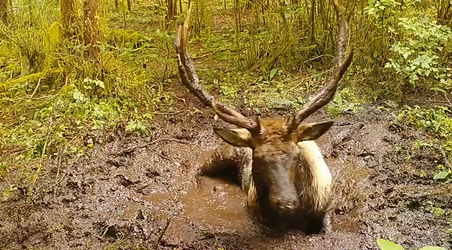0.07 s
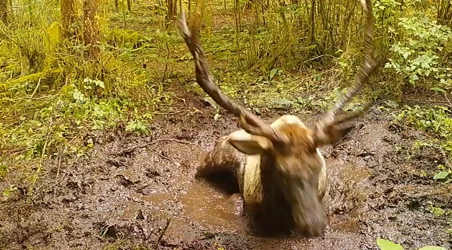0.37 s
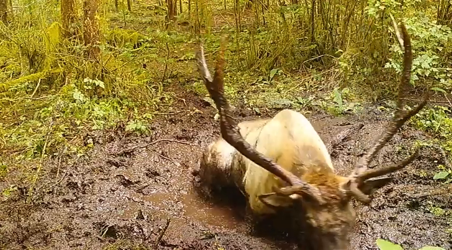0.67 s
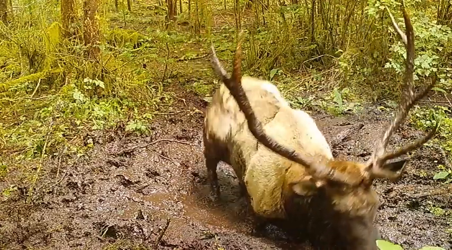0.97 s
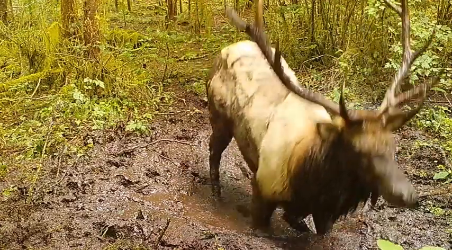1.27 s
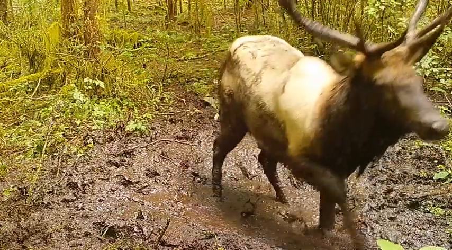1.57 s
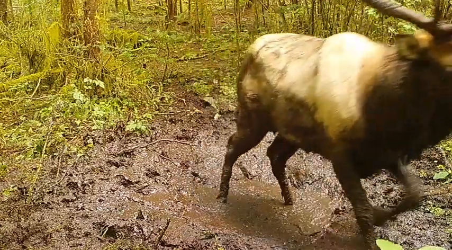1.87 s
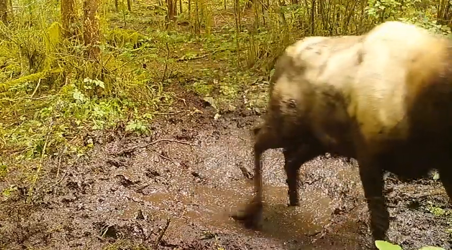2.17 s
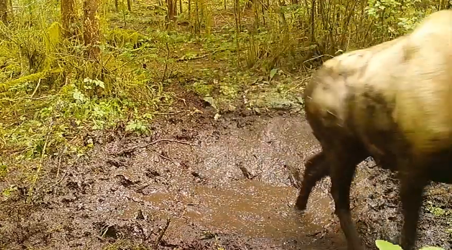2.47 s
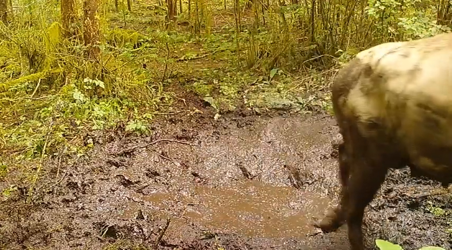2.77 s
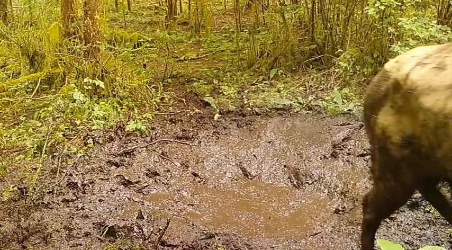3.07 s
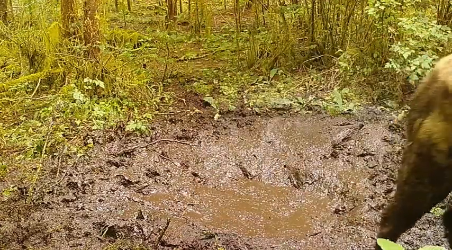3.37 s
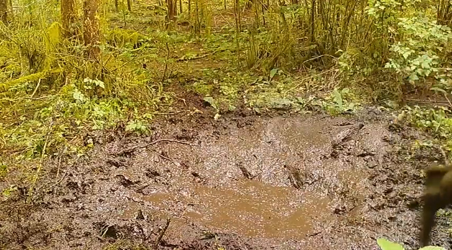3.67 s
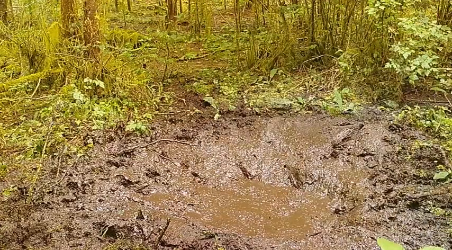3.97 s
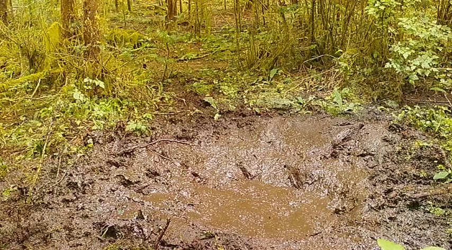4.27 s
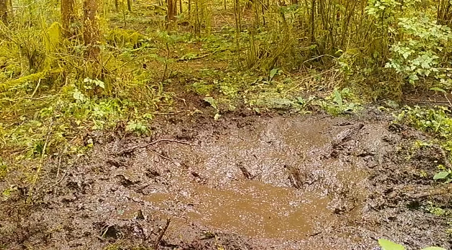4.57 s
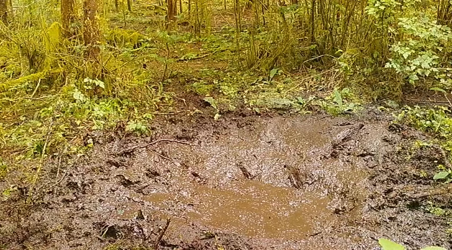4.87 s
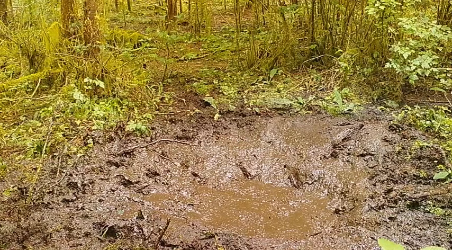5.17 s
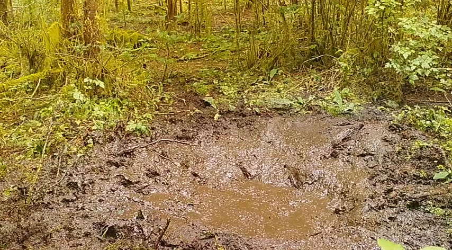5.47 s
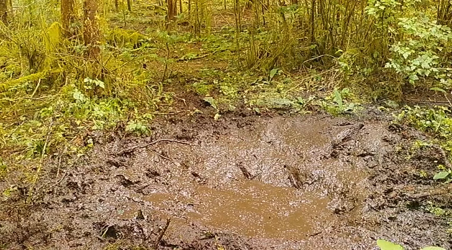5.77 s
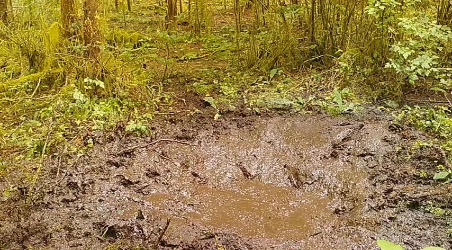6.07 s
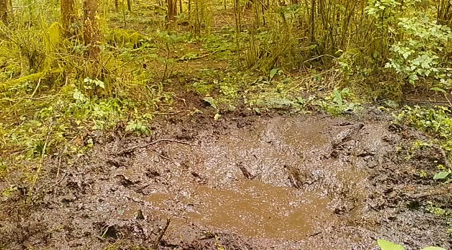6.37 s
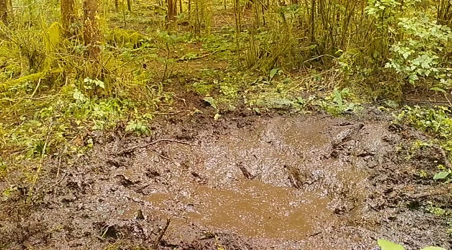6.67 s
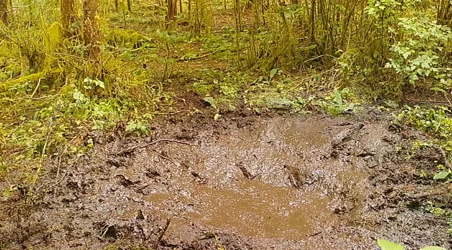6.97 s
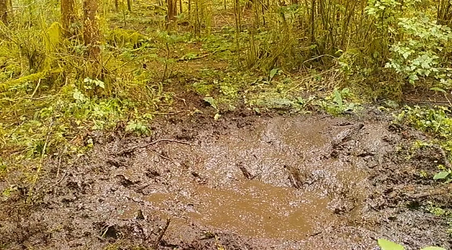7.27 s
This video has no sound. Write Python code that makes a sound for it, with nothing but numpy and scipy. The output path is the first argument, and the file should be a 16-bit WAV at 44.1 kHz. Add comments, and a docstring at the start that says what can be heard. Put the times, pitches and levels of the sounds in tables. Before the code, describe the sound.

An elk's hooves squelch, suck and crackle through wet mud, with snapping twigs and popping bubbles over a faint forest hiss.

```python
"""Elk leaving a forest wallow

One microphone near a muddy wallow, in the faint hiss of a still forest. An elk heaves itself out and
walks off through the undergrowth. Its hooves squeeze and suck at the mud, air pockets gulp, bubbles
and twigs snap, and wet mud and leaves crackle between the steps. The bushes dull it as it goes."""
import sys
import numpy as np
from scipy import signal
from scipy.io import wavfile
from scipy.ndimage import uniform_filter1d

SR = 44100
rng = np.random.default_rng(int(sys.argv[2]) if len(sys.argv) > 2 else 0)


def generate_wav(signal):
    """Clip the signal to [-1, 1] and save it as 16-bit WAV at the path in sys.argv[1]."""
    frames = np.transpose(np.atleast_2d(signal))
    scaled = np.clip(frames, -1, 1) * 32767
    pcm = np.round(scaled).astype(np.int16)
    wavfile.write(sys.argv[1], SR, pcm)


N = 327222

# Levels are relative within each table; "body" is the low band re the bright one.
# spectra of the still forest, the leaf litter and the wet mud: f/Hz, level/dB
AIR_SPECTRUM = [(15, -60), (25, -15), (349, -13.5), (1080, -12), (1340, -9), (1750, -13), (2560, -12.5),
                (3700, -9), (5000, -5.5), (6210, -7.5), (7500, -15.5), (15500, -14)]
LITTER_SPECTRUM = [(150, -63), (250, -33.5), (466, -18), (573, -16.5), (692, -15), (809, -18.5),
                   (1100, -14.5), (1430, -11.5), (2060, -12), (2620, -7.5), (3110, -9.5), (5040, -3.5),
                   (7250, -17.5), (13700, -27.5), (15500, -21.5)]
MUD_SPECTRUM = [(71, -100), (120, -55), (250, -16), (346, -19), (415, -22), (563, -13), (690, -17.5),
                (780, -19), (1100, -22.5), (1910, -6), (3730, 2), (4860, 8), (5380, 7), (5840, 2.5),
                (15500, -24.5)]
# echo off the trunks: f/Hz, level/dB, t60/s
TRUNK_ECHO = [(200, 5, 0.1), (1200, 9, 0.13), (3220, -1.5, 0.27), (5060, 1, 0.22), (7500, -0.5, 0.35),
              (14100, 4.5, 0.25)]
# restless mud and leaves between the steps: t/s, level/dB
STIRRING = [(0, -68), (.43, -73), (.65, -68), (.87, -76), (1.28, -75), (1.55, -58), (1.95, -57),
            (2.1, -54.5), (2.38, -60), (2.47, -58), (2.85, -72), (3.15, -64), (3.58, -68), (4.0, -57),
            (4.35, -67.5), (4.7, -59), (5.05, -75.5), (5.3, -69.5), (5.5, -55.5), (5.95, -60), (6.22, -68),
            (6.6, -63.5), (6.9, -62.5), (7.15, -74.5), (7.42, -61.5)]
# the elk shifts its weight: crest t/s, level/dB, fall/s, body/dB
WEIGHT_SHIFTS = [(0.067, -58.5, 0.019, -1.5), (.765, -65, 0.18, -1), (0.939, -62, 0.034, 1),
                 (1.07, -60, 0.074, -20), (1.58, -49, 0.13, -4.5), (1.72, -54, 0.11, -35),
                 (2.212, -47.5, 0.046, -7.5), (2.574, -41.5, 0.04, -13.5), (2.64, -49.5, 0.1, -8),
                 (3.04, -52.5, 0.081, -17), (3.395, -46, 0.1, -10), (3.792, -53, 0.14, -17),
                 (4.185, -49, 0.079, -13.5), (4.57, -61, 0.046, -9), (4.792, -49.5, 0.017, -13),
                 (4.89, -50.5, 0.064, -26), (4.938, -43.5, 0.024, -16), (5.17, -60, 0.19, -16),
                 (5.64, -55.5, 0.062, -10), (5.83, -59.5, 0.1, -6.5), (6.039, -55.5, 0.12, -16.5),
                 (6.274, -52.5, 0.017, -23), (6.562, -57, 0.064, -3.5), (6.758, -52.5, 0.014, -6.5)]
# dull pushes on the soft ground: t/s, level/dB, f/Hz
GROUND_THUDS = [(1.391, -67.5, 161), (1.455, -66, 135), (1.747, -72, 160), (2.88, -56.5, 100),
                (3.421, -72, 115), (3.918, -78, 130), (7.316, -63.5, 96)]
# water forced through a narrow gap: crest t/s, level/dB, f/Hz, length/s
WATER_SQUEAKS = [(0.077, -59, 5600, 0.02), (0.327, -59.5, 5550, 0.0082), (0.736, -56, 4500, 0.009),
                 (1.072, -58, 4530, 0.013), (3.12, -48.5, 5240, 0.0073), (4.446, -55, 4870, 0.018),
                 (4.537, -46.5, 5300, 0.0091), (4.56, -49.5, 4720, 0.032), (4.631, -51.5, 4950, 0.023),
                 (5.119, -44.5, 5200, 0.011), (6.05, -54, 5230, 0.0086), (6.565, -56, 5200, 0.032)]
# runs of bubbles: t/s, level/dB, f/Hz, length/s
BUBBLE_RUNS = [(0.05, -61, 1150, 0.031), (0.905, -60.5, 1910, 0.051), (1.367, -66, 490, 0.024),
               (1.406, -55.5, 1290, 0.0093), (1.468, -56.5, 720, 0.011), (2.688, -50.5, 1400, 0.0098),
               (4.846, -62.5, 885, 0.011), (4.91, -58.5, 1200, 0.026), (5.233, -65.5, 845, 0.0072),
               (5.451, -66, 884, 0.0076), (5.687, -57.5, 1104, 0.022), (6.44, -63, 750, .012),
               (6.466, -63, 785, .025)]
# small bubbles popping: t/s, level/dB, f/Hz
BUBBLE_POPS = [(.067, -41.5, 1460), (0.201, -45.5, 1830), (.222, -44, 6860), (0.276, -50, 2280),
               (0.813, -40, 1290), (1.037, -45.5, 1910), (1.059, -51, 1670), (1.218, -45, 2670),
               (1.422, -46, 2320), (1.606, -22, 6960), (1.658, -28.5, 2360), (1.667, -33, 8400),
               (1.673, -29.5, 7500), (1.717, -31, 5300), (1.83, -33, 4300), (2.025, -44, 2520),
               (2.403, -45, 2400), (2.574, -41, 1400), (2.58, -22, 3000), (2.593, -26, 4830),
               (2.627, -41.5, 1530), (2.915, -49, 1300), (2.92, -34.5, 2600), (2.925, -37.5, 1880),
               (3.47, -38, 2690), (3.62, -38.5, 2430), (3.795, -42, 1850), (3.939, -33.5, 2730),
               (4.551, -33.5, 4770), (4.68, -40.5, 2560), (5.076, -35.5, 2170), (5.077, -27.5, 3600)]
# hoof-sized hollows gulping: t/s, level/dB, f/Hz, glide/(octaves per s), t60/s, side modes/dB
HOOF_HOLLOWS = [(1.519, -43, 475, -10.5, 0.057, -18), (1.55, -57.5, 330, 22, 0.09, 1),
                (1.804, -52, 542, 21, 0.073, -21), (2.579, -49.5, 340, 41, 0.028, -12),
                (2.8757, -31.5, 554, -10, 0.059, -2.5), (2.881, -43, 203, -5, 0.038, -30),
                (2.905, -47, 481, -3.5, 0.049, -20), (3.306, -48, 385, -6.5, 0.055, 8.5),
                (3.337, -52.5, 475, -20, 0.068, -14), (3.386, -46.5, 385, 12, 0.017, -3),
                (3.416, -34.5, 523, 4, 0.031, 3.5), (3.417, -39, 820, -13, 0.033, -8),
                (3.423, -39, 345, 11, 0.035, 1.5), (3.632, -47.5, 385, -10.5, 0.064, -25)]
# side modes of a hollow: ratio to its pitch, level/dB
SIDE_MODES = [(.65, -25), (1.6, -13), (2.2, -22), (2.65, -2.5), (3.35, -4)]
# bursting mud films and snapping twigs: t/s, level/dB, body/dB, fizz/dB
SNAPS = [(0.2188, -40.5, -7, -8), (0.59, -44, -4, -8), (.602, -52, -22, 4), (.752, -53, -22, 16),
         (0.8103, -47, -23, -5), (1.582, -29, -5, -19), (1.561, -35, 4, 4), (1.604, -39, -30, 3),
         (1.659, -28.5, -14, -12), (1.683, -38, -20, 8), (1.6882, -23.5, -5, -4.5), (1.743, -17, -7.5, -11),
         (1.8035, -19.5, -10.5, -5.5), (1.9854, -37, -28, -2), (2.146, -24, -7, 3),
         (2.2797, -29.5, -6.5, -6), (2.314, -31, -28, -33), (2.539, -23.5, -20, -17),
         (2.5531, -14.5, -16, -40), (2.565, -33, -14, 2), (2.606, -31, -27, -1), (2.622, -25.5, -16, -14),
         (2.66, -38, -25, -5), (2.8783, -22.5, -7, -19), (2.994, -39, -13, 4), (3.2042, -34, -38, -6),
         (3.426, -13, -14.5, -9), (3.622, -29, -17, -13), (3.664, -35, -15, -6), (3.8288, -28.5, -16, -25),
         (3.8463, -29, -8, -23), (3.993, -38.5, -27, 2), (3.97, -47, -27, -9), (4.01, -51, -28, 15),
         (4.108, -39.5, -16, 7.5), (4.124, -39, -30, 4), (4.139, -35, -35, -23), (4.025, -49, -27, 9),
         (4.052, -45, -27, -3), (4.2841, -39, -23, -3), (4.364, -38.5, -25, -7), (4.479, -34.5, -33, -13),
         (4.704, -41, -25, -4), (4.924, -27, -6.5, -29), (4.9788, -26, -51, -9), (5.529, -24.5, -14, -12.5),
         (5.6002, -29, -12, -35), (5.672, -32, -25, -16), (5.937, -38, -22, -4), (6.0754, -24.5, -18, -3),
         (7.315, -20.5, -12.5, -6), (7.3191, -36, -4, 2)]
# mud slapping down: t/s, level/dB, fall/s, body/dB
MUD_SLAPS = [(0.263, -56, 0.011, -2), (0.747, -47.5, 0.0059, -15), (0.788, -51, 0.0081, -26),
             (0.813, -40, 0.0058, -13), (.914, -54, 0.037, -10), (1.03, -53.5, 0.0093, -18),
             (1.328, -52.5, 0.014, -12), (1.747, -25.5, 0.0066, -10), (1.781, -34, 0.0063, -14),
             (1.805, -34, 0.0093, -11), (2.152, -30.5, 0.0027, -28), (2.28, -36, 0.016, -26),
             (2.884, -34.5, 0.0082, -4), (2.919, -44.5, 0.019, -23), (2.955, -40, 0.024, -6.5),
             (3.031, -39, 0.018, -21), (3.057, -39, 0.0047, -18), (3.1, -50.5, 0.065, -13),
             (3.2874, -43.5, 0.024, -1), (3.388, -32.5, 0.0063, -17), (4.409, -54, 0.026, -8.5),
             (4.533, -55, 0.0045, -1.5), (4.935, -40, 0.0024, -8), (5.447, -55, 0.014, -2),
             (5.153, -42.5, 0.0019, -11), (5.629, -50, 0.0036, -11), (6.08, -39.5, 0.0013, 1),
             (6.139, -46, 0.0013, -9), (6.153, -52, 0.014, -6), (6.36, -51.5, 0.0063, -15),
             (6.443, -45, 0.011, -16), (6.485, -48.5, 0.014, -7.5), (7.321, -42, 0.024, -16)]
# suction building and breaking as a hoof pulls free: break t/s, level/dB, rise/s, body/dB
HOOF_PULLS = [(1.7, -35, 0.0066, -9), (3.311, -29, 0.0075, -42), (3.422, -29, 0.0083, -9.5),
              (3.64, -39, 0.0089, -11), (4.994, -42.5, 0.0089, -28), (5.7, -35, 0.0083, -37)]

BODY_HZ, FIZZ_HZ = 2000, 6500  # the body lies below the first, a snap's fizz above the second
STEP_RISE_SHARE = 0.87  # a step's rise time as a share of its fall


def gain_of(db):
    """Decibels to amplitude."""
    return 10 ** (np.asarray(db) / 20)


def unit_rms(x):
    """Scales to rms 1."""
    return x / np.sqrt(np.mean(x ** 2) + 1e-20)


def unit_energy(x):
    """Scales to energy 1."""
    return x / np.sqrt(np.sum(x ** 2) + 1e-20)


def value_at(points, hz):
    """Interpolates on a log-frequency axis."""
    f, value = np.transpose(points)
    return np.interp(np.log(hz + 1), np.log(f + 1), value)


def add(mix, s, sound):
    """Mixes a sound in at time s."""
    part = mix[max(round(s * SR), 0):][:len(sound)]
    part += sound[:len(part)]


def colour(x, spectrum, size=2048):
    """Causal filter with the given spectrum, so that clicks keep their sharp front."""
    log_gain = np.log(gain_of(value_at(spectrum, abs(np.fft.fftfreq(size, 1 / SR)))))
    taps = np.fft.ifft(np.exp(np.conj(signal.hilbert(log_gain)))).real
    return signal.oaconvolve(x, taps)[:len(x)]


def band(x, hz, kind, order=3):
    """Butterworth filter."""
    return signal.sosfilt(signal.butter(order, hz, kind, fs=SR, output="sos"), x)


def resonate(x, hz, width_hz):
    """A resonance of gain 1 that follows the curve hz."""
    turn = np.exp(2j * np.pi * np.cumsum(hz) / SR)
    pole = np.exp(-np.pi * width_hz / SR)
    return 2 * (turn * signal.lfilter([1 - pole], [1, -pole], x / turn)).real


def swell(t, rise_s, fall_s):
    """Grows to 1 at t = 0, then dies away."""
    return np.exp(np.maximum(np.minimum(t / rise_s, -t / fall_s), -20))


def air(forest_db=-68.5, hiss_db=-76):
    """The steady faint hiss of the still forest, with a little electronic hiss on top."""
    hiss = gain_of(hiss_db) * unit_rms(band(rng.standard_normal(N), 16000, "high"))
    return gain_of(forest_db) * unit_rms(colour(rng.standard_normal(N), AIR_SPECTRUM, 8192)) + hiss


def forest_echo(x, ground_db=-11, ground_s=0.0025, trunks_db=-13):
    """The ground and nearby stems scatter at once; trunks farther off return a thin, bright tail."""
    t = np.arange(SR // 2) / SR
    near, far = rng.standard_normal((2, len(t))) * (rng.random((2, len(t))) < 3000 / SR)
    hz, delay, spectra = signal.stft(far, SR, nperseg=256)
    echo = np.array(TRUNK_ECHO)
    start_db, t60 = value_at(echo[:, :2], hz)[:, None], value_at(echo[:, ::2], hz)[:, None]
    tail = signal.istft(spectra * gain_of(start_db - 60 * delay / t60), SR, nperseg=256)[1][:len(t)]
    ground = gain_of(ground_db) * unit_energy(near * t * np.exp(-2 * t / ground_s))
    trunks = gain_of(trunks_db) * unit_energy(tail * (1 - np.exp(-t / 0.0032)))
    return x + signal.oaconvolve(x, ground + trunks)[:N]


def screening(x, lying_db=-3.5, stands_s=2.1, open_db=4, bushes_s=2.57, dulling_db_per_s=2.5):
    """The elk's body shades the upper mids until it stands; later, bushes steadily dull the treble."""
    t = np.arange(N) / SR
    treble, bright = (signal.sosfiltfilt(signal.butter(2, hz, "high", fs=SR, output="sos"), x)
                      for hz in (7000, 3800))
    mid_gain = gain_of(lying_db * np.clip(1 - t / stands_s, 0, 1))
    treble_gain = gain_of(open_db - dulling_db_per_s * np.maximum(t - bushes_s, 0))
    return x + (treble_gain - 1) * treble + (mid_gain - 1) * (bright - treble)


def shifting_cavities(x, depth_db, patch_hz=1100, patch_s=.012, size=256):
    """Cavities in the mud keep changing shape, so different pitches stand out for a moment."""
    spectra = signal.stft(x, SR, nperseg=size)[2]
    bins, frames = round(patch_hz * size / SR), round(patch_s * 2 * SR / size)
    patches = uniform_filter1d(rng.standard_normal(spectra.shape), bins, 0)
    patches = unit_rms(uniform_filter1d(patches, frames, 1))
    emphasis = unit_rms(gain_of(depth_db * np.clip(patches, -2, 2)))
    return signal.istft(spectra * emphasis, SR, nperseg=size)[1][:N]


def bubbles(per_s, spread_db, cycles, low_hz=300, high_hz=14000, pitches=30):
    """Tiny bursts, a few of them large, each ring at one pitch. Returns the rings and the bare clicks."""
    t, rings = np.arange(900) / SR, np.zeros(N)
    bursts, pitch_index = rng.random(N) < per_s / SR, rng.integers(0, pitches, N)
    sizes = gain_of(spread_db * np.minimum(rng.exponential(1, N), 3.5))
    clicks = bursts * sizes * rng.choice([-1, 1], N)
    for k, hz in enumerate(np.geomspace(low_hz, high_hz, pitches)):
        ring = unit_energy(np.sin(2 * np.pi * hz * t) * np.exp(-t * hz / cycles))
        rings += np.sqrt(hz) * signal.oaconvolve(clicks * (pitch_index == k), ring)[:N]
    return unit_rms(rings), unit_rms(clicks)


def spits(per_s=26, spread_db=3, burst_s=0.00064):
    """Now and then a lone film of mud bursts with a sharp, bright tick."""
    clicks = (rng.random(N) < per_s / SR) * gain_of(spread_db * np.minimum(rng.exponential(1, N), 2.5))
    envelope = signal.oaconvolve(clicks, np.exp(-np.arange(400) / SR / burst_s))[:N]
    ticks = colour(envelope * rng.standard_normal(N), LITTER_SPECTRUM)
    return unit_rms(band(ticks, 1800, "high", order=1))


def crackle(clump_db=3.5, clump_hz=45, spray_s=0.0024, wet_follows=0.26):
    """Films of mud burst in little clumps as the animal moves, swelling with each shift of weight."""
    t = np.arange(N) / SR
    rings, ticks = bubbles(per_s=1900, spread_db=4.5, cycles=1.54)
    drips = bubbles(per_s=300, spread_db=3, cycles=6, low_hz=900, high_hz=7000)[0]
    grains = colour(rings + gain_of(-9) * drips + gain_of(-10) * ticks, LITTER_SPECTRUM)
    # each burst throws a few ms of finer spray
    pole = np.exp(-1 / (spray_s * SR))
    spray_envelope = np.sqrt(signal.lfilter([1 - pole], [1, -pole], grains ** 2))
    spray = spray_envelope * unit_rms(colour(rng.standard_normal(N), LITTER_SPECTRUM))
    clumps = np.clip(unit_rms(band(rng.standard_normal(N), clump_hz, "low")), -2, 2)
    grains = (grains + gain_of(-3) * spray) * gain_of(clump_db * clumps)
    stir_db = np.interp(t, *np.transpose(STIRRING))
    wet_db = -74.5 + wet_follows * (stir_db - stir_db.mean())  # larger, wetter bubbles vary less
    fine_power, wet_power = gain_of(stir_db) ** 2, gain_of(wet_db) ** 2
    for s, db, fall, body_db in WEIGHT_SHIFTS:
        power = (gain_of(db) * swell(t - s, STEP_RISE_SHARE * fall, fall)) ** 2
        fine_power += power
        wet_power += power * gain_of(body_db) ** 2
    fine = np.sqrt(fine_power) * unit_rms(band(grains, 4030, "high"))
    wet = np.sqrt(wet_power) * unit_rms(band(grains, 2900, "low"))
    return fine + gain_of(-1) * wet + gain_of(stir_db - 13) * spits()


def thuds(half_width_oct=0.75, rise_s=0.0006, fall_s=0.012, size=6000):
    """The soft ground takes a weight with a dull push."""
    t, out = np.arange(size) / SR, np.zeros(N)
    shape = (1 - np.exp(-t / rise_s)) * np.exp(-t / fall_s)
    for s, db, hz in GROUND_THUDS:
        push = rng.standard_normal(size) * shape
        thud = band(push, [hz / 2 ** half_width_oct, hz * 2 ** half_width_oct], "band")
        add(out, s, gain_of(db) * np.linalg.norm(shape) * unit_energy(thud))
    return out


def squeaks(width_hz=650, glide_oct_per_s=4, spread_db=2, size=4096):
    """Water stutters through a gap in the mud and rings it; the pitch rises as the gap closes."""
    t, out = (np.arange(size) - size / 2) / SR, np.zeros(N)
    for s, db, hz, length in WATER_SQUEAKS:
        push, sizes = rng.standard_normal((2, size))
        shape = np.exp(-2 * (t / length) ** 2)
        stutter = push * gain_of(spread_db * sizes) * shape
        pitch = hz * 2 ** (glide_oct_per_s * t)
        ring = resonate(resonate(stutter, pitch, width_hz), pitch, 2 * width_hz)
        add(out, s + t[0], gain_of(db) * np.linalg.norm(shape) * unit_energy(ring))
    return out


def gurgles(spread_oct=0.4, cycles=1.6, count=8):
    """Wet mud lets go a quick run of soft bubbles of mixed sizes, each rising a little in pitch."""
    t, out = np.arange(4096) / SR, np.zeros(N)
    for s, db, hz, length in BUBBLE_RUNS:
        jitter, pitch, strength = rng.random((3, count, 1))
        age = np.maximum(t - length * (np.arange(count)[:, None] + jitter) / count, 0)
        turns = hz * 2 ** (spread_oct * (2 * pitch - 1)) * age * (1 + 6 * age)
        envelope = (.5 + strength) * (1 - np.exp(-turns)) * np.exp(-turns / cycles)
        rings = envelope * np.sin(2 * np.pi * turns)
        add(out, s, gain_of(db) * np.sqrt(length * SR) * unit_energy(rings.sum(0)))
    return out


def air_pocket(db, hz, glide, t60, open_s, slop_db=-9, slop_share=0.71, size=5000):
    """A pocket of air rings and glides as it changes size; its soft walls wobble and slop."""
    t = np.arange(size) / SR
    wall, push = rng.standard_normal((2, size))
    wobble = 1 + .35 * np.tanh(unit_rms(band(wall, hz / 4, "low")))
    pitch = hz * 2 ** (glide * np.minimum(t, t60))
    ring = wobble * np.sin(2 * np.pi * np.cumsum(pitch) / SR) * gain_of(-60 * t / t60)
    slop = unit_rms(band(push, [hz * .65, hz * 1.3], "band", order=2))
    slop *= gain_of(slop_db - 60 * t / (slop_share * t60))
    return gain_of(db) * (ring + slop) * (1 - np.exp(-(t / open_s) ** 2))


def gulps(boost_db=7.5, damping=0.51, open_share=0.087):
    """Hollows under the hooves open slowly in thick mud and ring; their higher modes die sooner."""
    out = np.zeros(N)
    for s, db, hz, glide, t60, side_db in HOOF_HOLLOWS:
        modes = [(1, 0)] + [(ratio, side_db + mode_db) for ratio, mode_db in SIDE_MODES]
        for ratio, mode_db in modes:
            mode_t60 = t60 / ratio ** damping
            add(out, s, air_pocket(db + boost_db + mode_db, hz * ratio, glide, mode_t60, open_share * t60))
    return out


def pops(cycles=37):
    """Small bubbles burst at a single pitch, half ring and half smack."""
    out = np.zeros(N)
    for s, db, hz in BUBBLE_POPS:
        pop = air_pocket(db - 1, hz, glide=0, t60=cycles / hz, open_s=1 / hz, slop_db=-5, slop_share=0.54)
        add(out, s, pop)
    return out


def snaps(boost_db=9, ring_hz=4800, cycles=3, tear_s=0.001, splash_s=0.014, size=2048):
    """A mud film or twig gives way: a sharp-edged crack, a brief ring and a little splash."""
    t, out = np.arange(size) / SR, np.zeros(N)
    for (s, db, body_db, fizz_db), (tear, spray) in zip(SNAPS, rng.standard_normal((len(SNAPS), 2, size))):
        hz = ring_hz * 2 ** rng.uniform(-0.32, 0.16)
        ring = unit_energy(np.sin(2 * np.pi * hz * t) * t * np.exp(-t * hz / cycles))
        edge = unit_energy(np.tanh(tear) * (1 - np.exp(-t / 0.00057)) * np.exp(-t / tear_s))
        splash = unit_energy(spray * np.exp(-t / splash_s))
        muddy = unit_energy(colour(edge + gain_of(-7) * splash, MUD_SPECTRUM))
        crack = muddy + gain_of(-10) * ring + gain_of(-4) * band(edge, BODY_HZ, "high", order=2)
        body = gain_of(body_db) * unit_energy(band(crack, [350, BODY_HZ], "band"))
        bright = unit_energy(band(crack, [BODY_HZ, FIZZ_HZ], "band"))
        fizz = gain_of(fizz_db) * unit_energy(band(crack, FIZZ_HZ, "high", order=5))
        add(out, s, gain_of(db + boost_db) * (body + bright + fizz))
    return out


def squelches(slap_rise_s=0.0033, break_s=0.0061, squeeze_share=0.7, width_hz=170, glide_oct_per_s=5):
    """As a hoof slaps, pulls or squeezes, the bursts crowd into a spurt that swells and collapses."""
    rings, ticks = bubbles(per_s=7000, spread_db=2, cycles=4.4)
    grains = colour(rings + gain_of(-4) * ticks, MUD_SPECTRUM)
    specks = bubbles(per_s=1300, spread_db=8, cycles=2, pitches=1)[1]
    fizz = gain_of(-19) * unit_rms(band(specks, 9000, "high"))
    spray = unit_rms(band(grains, BODY_HZ, "high")) + fizz
    body = band(grains, [280, BODY_HZ], "band")
    slaps = [(s, db, slap_rise_s, fall, body_db) for s, db, fall, body_db in MUD_SLAPS]
    pulls = [(s, db, rise, break_s, body_db) for s, db, rise, body_db in HOOF_PULLS]
    squeezes = [(s, db - 1, STEP_RISE_SHARE * squeeze_share * fall, squeeze_share * fall, body_db)
                for s, db, fall, body_db in WEIGHT_SHIFTS]
    out = np.zeros(N)
    for s, db, rise, fall, body_db in slaps + pulls + squeezes:
        span = np.arange(max(int((s - .12) * SR), 0), min(int((s + .24) * SR), N))
        t = span / SR - s
        shape = swell(t, rise, fall)
        low, high = shape * body[span], shape * spray[span]
        # the gap under the hoof has two resonances, which rise as it closes
        closing = 2 ** (glide_oct_per_s * np.clip(t, -.04, .04))
        low_hz, high_hz = np.array([1500, 4650]) * 2 ** rng.uniform(-0.84, 0.45, 2)
        low_ring = unit_energy(resonate(low, low_hz * closing, width_hz))
        high_ring = unit_energy(resonate(high, high_hz * closing, 9.2 * width_hz))
        hollow = unit_energy(unit_energy(low) + gain_of(1) * low_ring)
        bright = unit_energy(unit_energy(high) + gain_of(-7) * high_ring)
        out[span] += gain_of(db - 1) * np.linalg.norm(shape) * (bright + gain_of(body_db) * hollow)
    return out


def scene():
    """The elk's steps among the trees, heard in mono from beside the wallow."""
    pockets = band(gulps() + pops() + gurgles(), 140, "high", order=2)
    mud = shifting_cavities(crackle(), depth_db=2) + shifting_cavities(squelches(), depth_db=3.5)
    steps = screening(mud) + squeaks() + snaps() + pockets + thuds()
    return (forest_echo(steps) + air())[None]


def record(dry, soften_hz=12500, limit_hz=15900):
    """The microphone softens the very top; a steep band limit follows."""
    soft = band(dry, soften_hz, "low", order=2)
    band_limit = signal.firwin(511, limit_hz, window=("kaiser", 9), fs=SR)
    return signal.oaconvolve(soft, band_limit[None], "same")


dry = scene()
out = record(dry)
generate_wav(out)
```